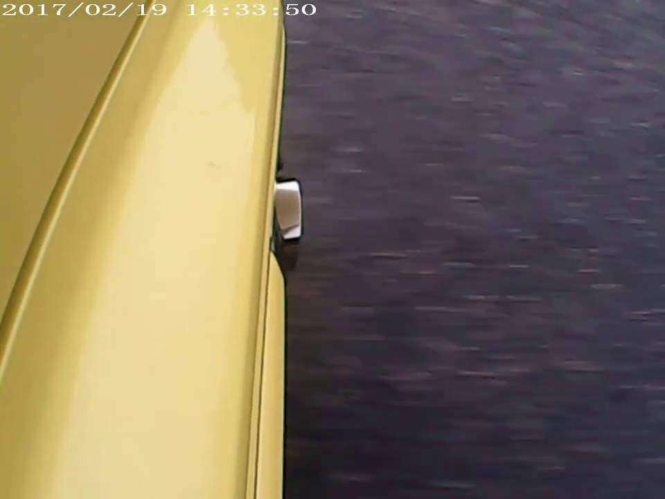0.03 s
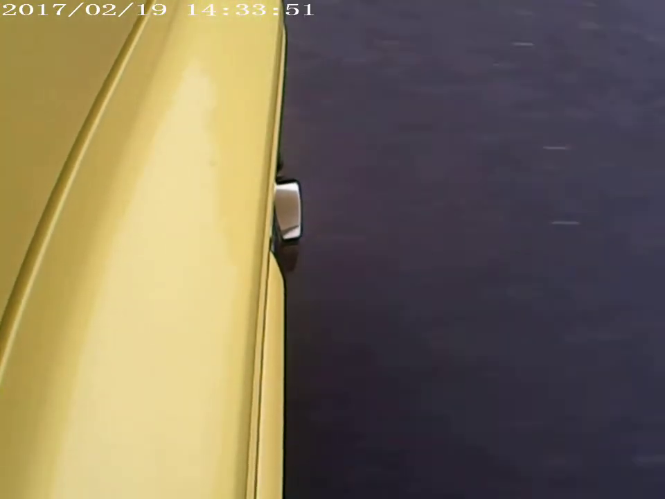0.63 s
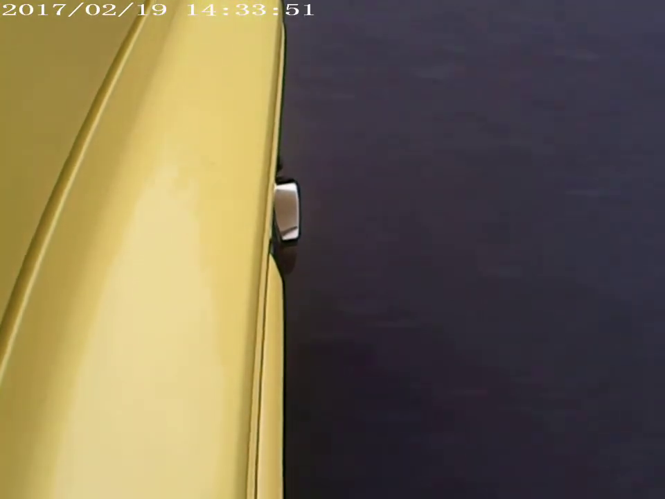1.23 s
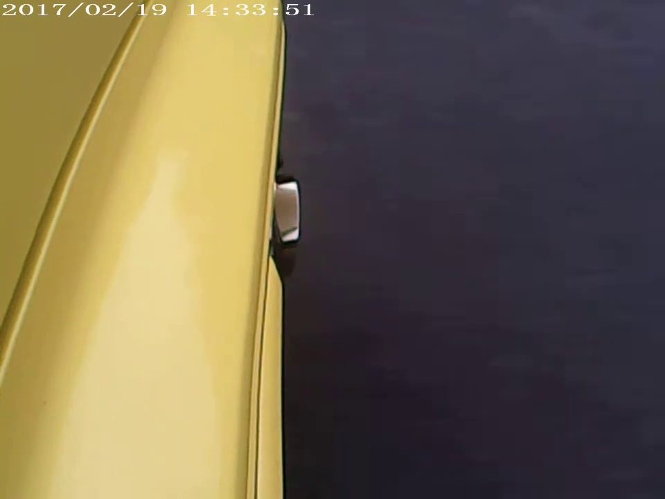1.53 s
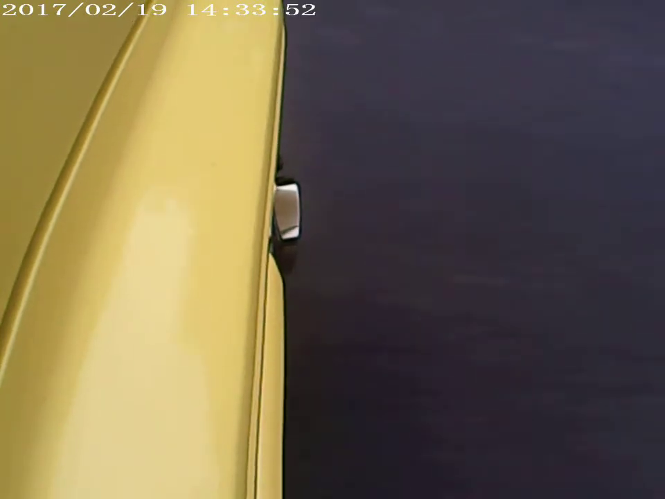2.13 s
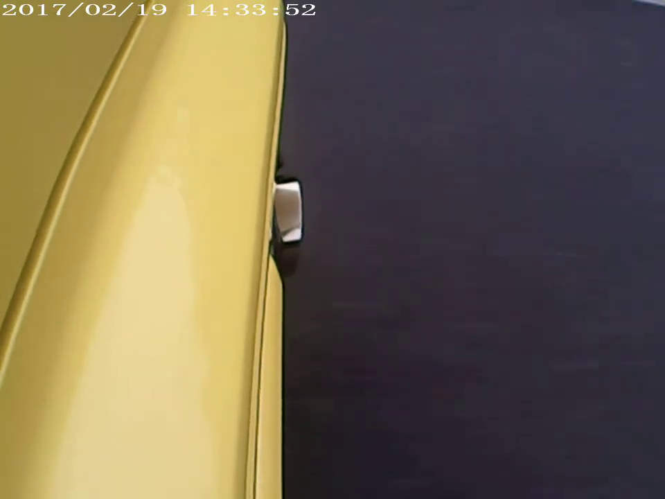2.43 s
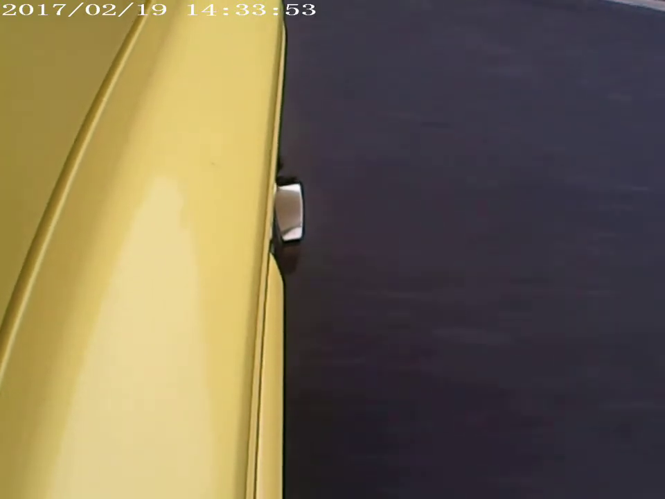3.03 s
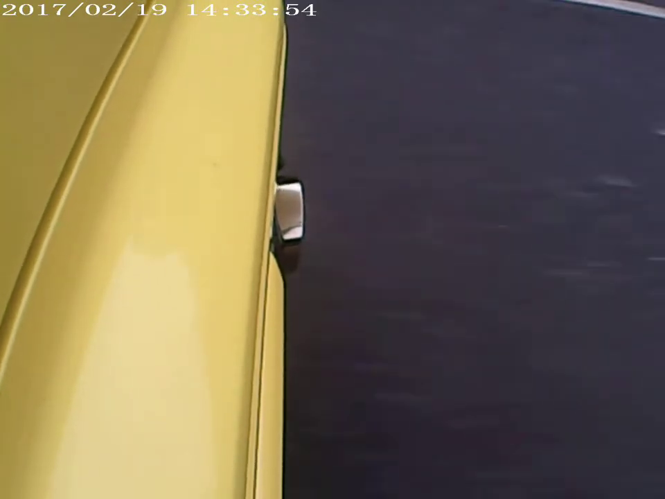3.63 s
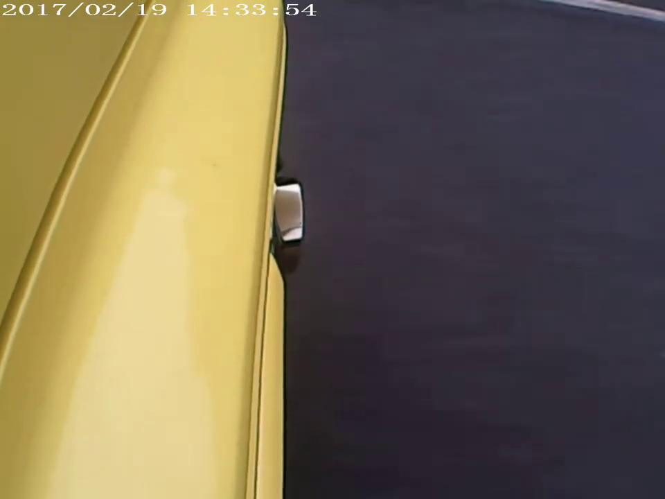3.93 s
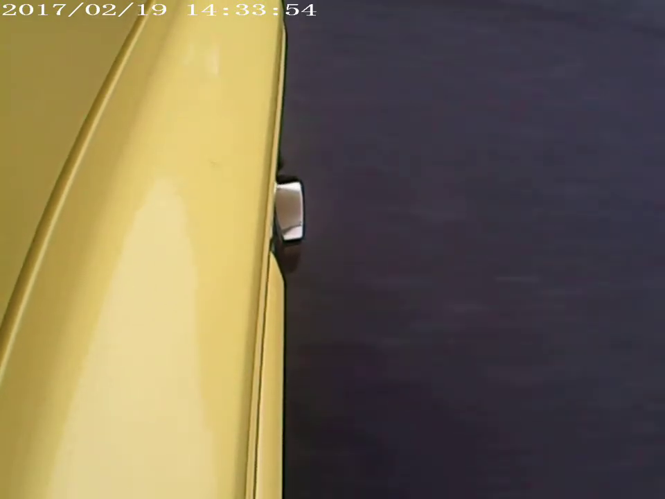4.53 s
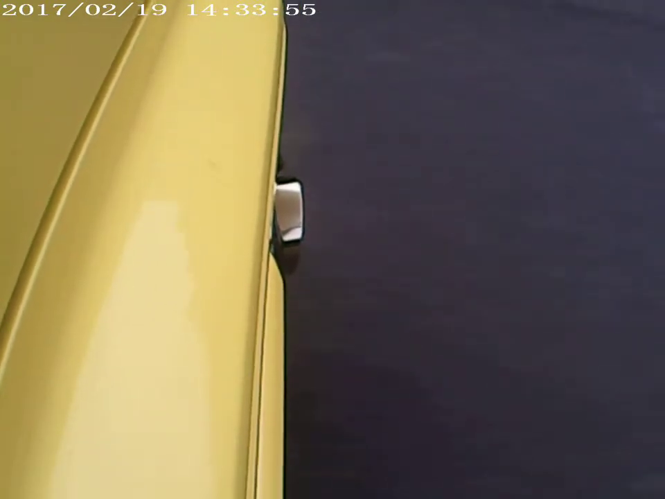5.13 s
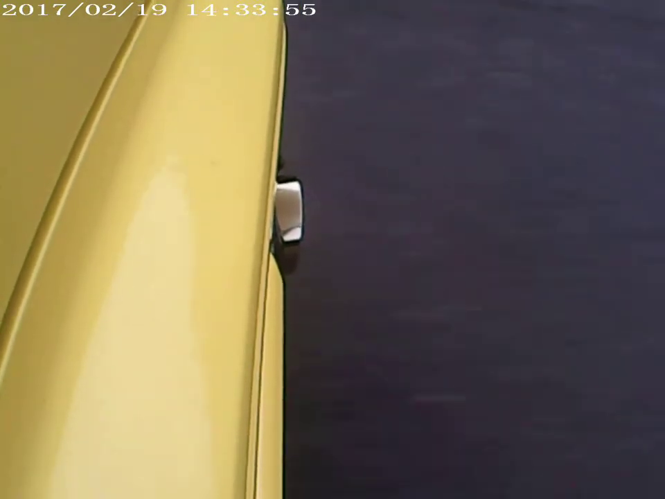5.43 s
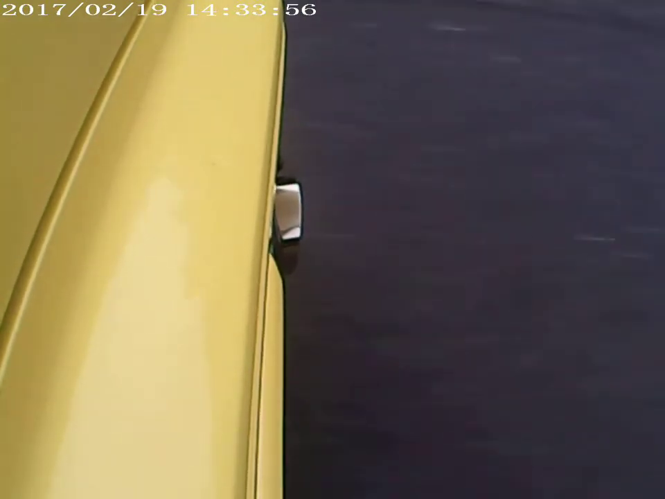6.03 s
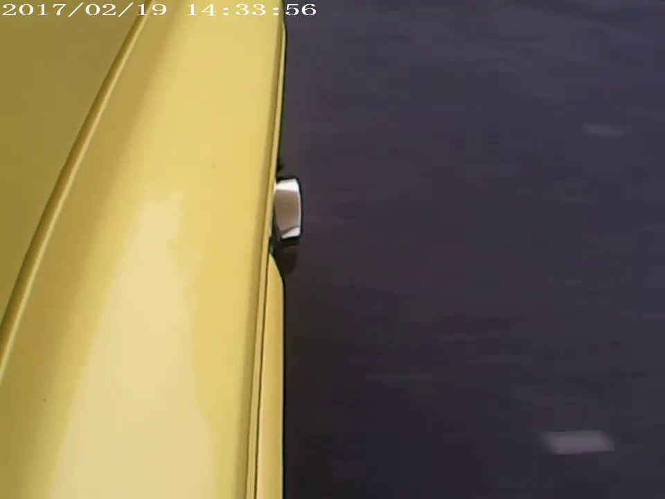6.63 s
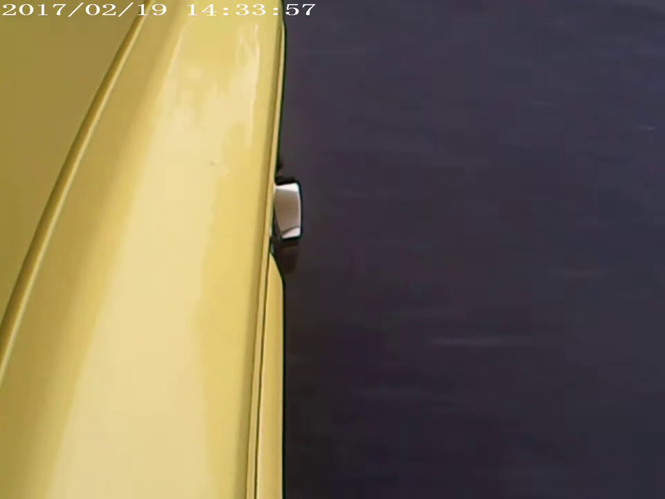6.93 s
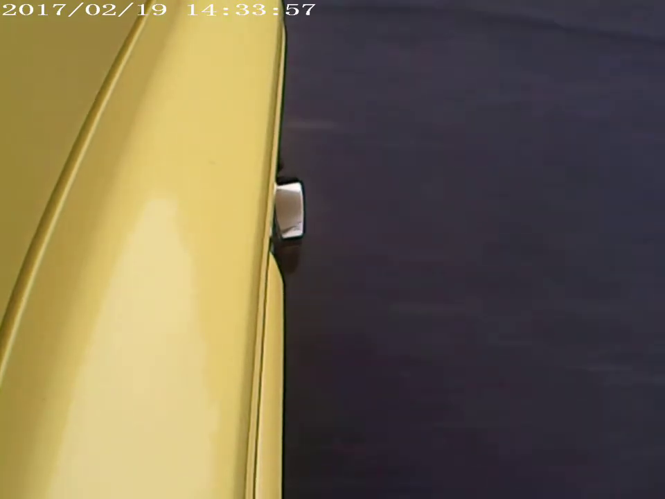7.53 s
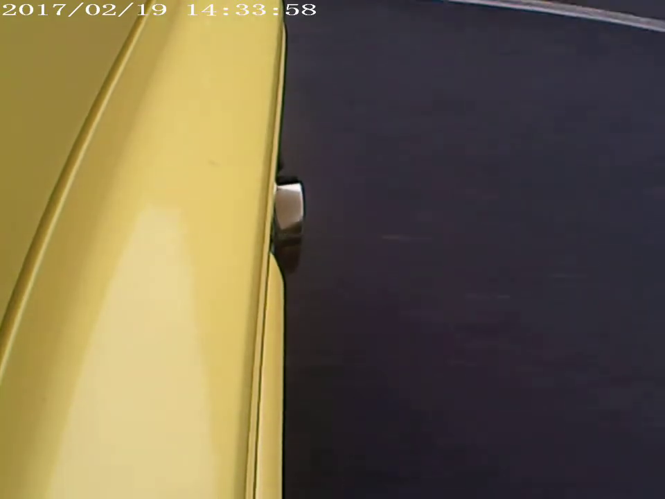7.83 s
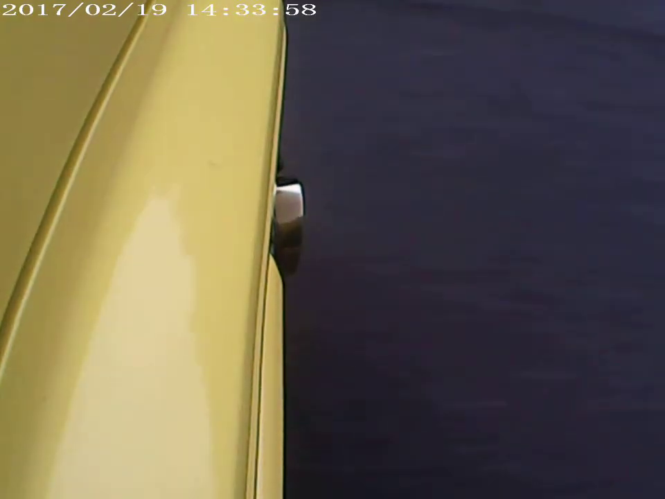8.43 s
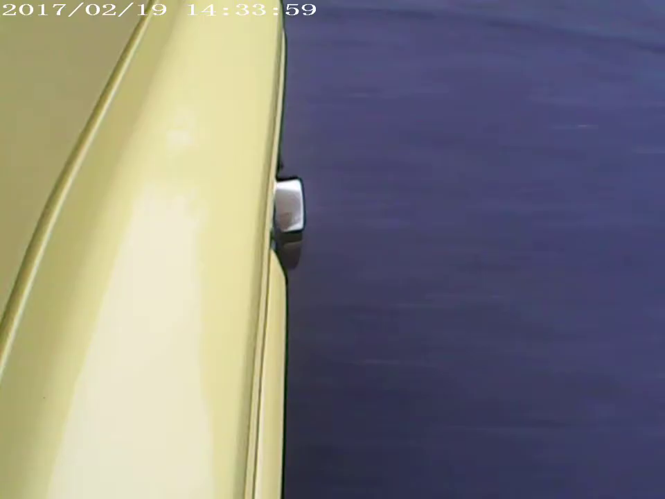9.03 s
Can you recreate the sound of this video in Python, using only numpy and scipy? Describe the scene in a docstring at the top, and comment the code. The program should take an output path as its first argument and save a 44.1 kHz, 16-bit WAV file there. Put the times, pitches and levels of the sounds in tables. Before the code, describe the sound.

Flurries of sharp crackle spit from a sports car's exhaust as it accelerates twice along a track, coasting after each pull. Each time the raspy engine drone falls away, there are muffled pops in the silencer and one hard bang that overloads the microphone. The microphone rides on the car's side, so wind buffeting and tyre roar run underneath, and everything sounds close and slightly boxy.

```python
"""On a race track, from a camera microphone riding on the flank of a four-cylinder sports car.
Close by, the exhaust drones and rasps through two pulls, and the car coasts after each.
On the overrun, fuel explodes at the tailpipe in two bangs that overload the microphone,
and lights in the silencer in strings of dull pops. Sharp crackle comes in flurries throughout,
over wind on the microphone and tyre roar. The camera housing colours it all."""
import sys
import numpy as np
from scipy import signal
from scipy.fft import rfft, irfft, next_fast_len
from scipy.io import wavfile
from scipy.ndimage import map_coordinates

SR = 44100
rng = np.random.default_rng(int(sys.argv[2]) if len(sys.argv) > 2 else 0)


def store_wav(level_fs):
    """Save 16-bit WAV to argv[1]."""
    pcm = np.round(np.clip(np.atleast_2d(level_fs), -1, 1) * 32767)
    wavfile.write(sys.argv[1], SR, pcm.T.astype(np.int16))


N = 408807
TIME = np.arange(N) / SR

# Levels in the tables are relative: each source adds its own gain.
# crankshaft speed: time_s, speed_hz
CRANK_SPEED = [(0.0, 57.4), (0.54, 61.36), (0.82, 64.76), (1.27, 74.45), (1.88, 90.05), (2.25, 96.44),
               (2.65, 93.4), (3.5, 89.77), (4.4, 84.68), (4.88, 69.57), (5.15, 68.44), (5.34, 61.35),
               (5.93, 65.72), (7.09, 79.76), (7.9, 78.64), (9.26, 75.76)]
# exhaust load, one list for each pull: time_s, load_db
PULL_LOADS = [
    [(0.0, -51.5), (0.6, -48), (1.0, -42.5), (1.16, -29), (1.5, -32.5), (1.78, -36.5), (2.15, -34.5),
     (2.22, -79)],
    [(5.1, -49.5), (5.53, -48), (5.91, -44), (6.24, -33), (6.54, -31.5), (7.04, -37), (7.16, -43.5),
     (7.3, -64)],
]
# the engine's low hum: time_s, level_db
HUM_LEVEL = [(0.0, -3), (0.55, -3), (0.8, -1.5), (1.4, 1), (1.85, -1), (2.18, 1.5), (2.28, -24),
             (2.85, -3.5), (3.55, -3), (4.08, -16), (4.36, -6.5), (4.7, -16), (5.3, -4), (6.2, -0.5),
             (7.05, -3.5), (7.4, -16), (9.27, -13)]
# brief low shudders at the crank speed: centre_s, level_db
CRANK_SHUDDERS = [(2.45, -38), (6.1, -40), (7.0, -37.5), (7.47, -32)]
# pipe resonances that lift the low orders: pitch_hz, gain_db
PIPE_RESPONSE = [(122, -36), (133, -28.5), (141, -23.5), (147, -33.5), (190, -33), (240, -33.5), (266, -30),
                 (280, -39), (289, -29), (303, -20), (337, -26), (356, -35.5)]
# exhaust note under load: crank_multiple, level_db
EXHAUST_ORDERS = [(3, 0.5), (5, -2), (6, 1.5), (7, -4), (8, -0.5), (9, -5), (10, -2.5), (11, -10), (12, -6),
                  (13, -9.5), (14, -16.5), (15, -12), (16, -15.5)]
# rasp of the exhaust gas: frequency_hz, level_db
RASP_SPECTRUM = [(100, -11), (300, 9), (480, -3), (750, 8.5), (1000, -9), (1500, 5), (2000, -12.5),
                 (3000, -28), (7000, -16)]
# hiss of the gas at high load: frequency_hz, level_db
HISS_SPECTRUM = [(900, -34.5), (1800, -4.5), (4000, -4.5), (7000, -4.5)]
# wind and tyres along the run: time_s, wind_db, tyre_db
ROAD_LEVELS = [(0.0, -40, -48), (0.64, -47, -48.5), (1.02, -39, -43), (1.18, -37.5, -43.5),
               (1.95, -43, -43.5), (2.25, -41, -45), (3.36, -35.5, -38), (3.54, -29.5, -39),
               (4.4, -38.5, -41.5), (5.59, -41.5, -41.5), (5.81, -40, -40.5), (6.2, -42, -39.5),
               (6.66, -44, -42), (7.43, -40.5, -46.5), (8.04, -41.5, -42), (8.61, -34.5, -42.5),
               (9.1, -37, -44), (9.2, -34, -42)]
# wind on the microphone: frequency_hz, level_db
WIND_SPECTRUM = [(15, -30), (28, 3.5), (48, -11.5), (65, 7), (88, 9.5), (115, -9.5), (200, -7.5),
                 (500, -56.5)]
# the car body booming on its tyres: frequency_hz, level_db
BOOM_SPECTRUM = [(70, -30.5), (130, -25.5), (190, -19.5), (245, -13), (312, 10.5), (390, -6), (480, -4.5),
                 (800, -33.5), (2000, -58)]
# tread roar: frequency_hz, level_db
TYRE_SPECTRUM = [(200, -0.5), (500, -4), (850, -4.5), (980, -0.5), (1090, 9.5), (1180, 1.5), (1330, -6.5),
                 (1650, 1.5), (2100, -24.5), (2800, -18), (4000, -28.5), (6800, -17.5)]
# flurries of crackle: start_s, end_s, top_level_db, chance_per_firing
CRACKLE_FLURRIES = [(0.02, 0.323, -9.5, 0.34), (0.49, 0.672, -11, 0.33), (1.14, 1.701, -7.5, 0.53),
                    (2.28, 2.7, -11, .4), (2.82, 3.37, -19, 0.21), (3.53, 4.651, -14, .22),
                    (4.66, 5.07, -10, 0.34), (5.26, 5.355, -19.5, 0.52), (6.05, 6.55, -15, 0.43),
                    (6.69, 7.1, -14.5, .55), (7.36, 7.581, -11.5, 0.9), (7.58, 7.758, -17.5, 0.33),
                    (8.04, 8.572, -14, 0.28), (8.58, 9.27, -12, .33)]
# the loudest cracks, fuller with more body: start_s, level_db, body_db
LOUD_CRACKS = [(0.0353, -3, -15.5), (0.0759, -9.5, -13), (0.158, -9, -14.5), (0.1825, -16, -7.5),
               (0.197, 0.5, -17), (0.2631, -14.5, -10), (0.307, -18.5, -8), (0.5283, -14, -10),
               (0.568, -6.5, -14), (0.611, -5.5, -18.5), (0.6401, -17, -1.5), (0.6542, -7.5, -17),
               (1.1584, -16, -12), (1.3263, -13, -25.5), (1.3736, 1, -15), (1.4118, -8, -21),
               (1.6469, -6, -12), (2.2916, -13.5, -17), (2.3716, -10, -18), (2.391, -12, -10.5),
               (2.48, -6.5, -12.5), (2.524, -10.5, -15.5), (2.5358, -12, -16.5), (2.5672, -11, -13.5),
               (2.6569, -12.5, -11), (2.8491, -12, -1), (2.8861, -17.5, -10), (3.023, -10, -5.5),
               (3.0365, -14, -2.5), (3.0766, -13.5, 0.5), (3.244, -13, -10), (3.263, -9.5, -8.5),
               (3.6256, -13.5, -5), (3.7592, -15, -8), (3.933, -13, -8.5), (3.952, -14.5, -3.5),
               (4.0485, -10.5, -4), (4.3296, -17, -4.5), (4.4161, -17, 5), (4.6389, -18, -2.5),
               (4.6707, -10, -12.5), (4.6848, -7.5, -11.5), (4.711, -8, -10.5), (4.7221, 0, -17),
               (4.8261, -9, -19.5), (4.8442, -7, -15.5), (4.8745, -7, -13), (4.9263, -12, -6.5),
               (4.967, 3, -14), (5.022, -4, -10.5), (5.3093, -12, -13.5), (6.0642, -8.5, -8),
               (6.3261, -12, -21.5), (6.4412, -12.5, -13), (6.4688, -10.5, -10), (7.0336, -14, -11),
               (7.1283, -12.5, -24.5), (7.6649, -9.5, -9.5), (8.0585, -20.5, -4.5), (8.1881, -10.5, -13.5),
               (8.2246, -13.5, -10), (8.397, -13.5, -9.5), (8.6155, -11.5, -6.5), (8.7312, -2, -15.5),
               (8.7729, -8, -14.5), (8.7893, -10, -15.5), (8.8672, -11.5, -17.5), (9.0541, -11.5, -14.5),
               (9.0991, -11, -14.5), (9.142, -15, -16), (9.1576, -6.5, -14)]
# lead-in, snap and rebound of a loud crack: delay_s, level_db
CRACK_CLUSTER = [(-0.0045, -17.5), (0, 0), (0.0043, -11)]
# dull pops inside the silencer: start_s, level_db
SILENCER_POPS = [(2.382, -16.5), (2.562, -19.5), (3.595, -16.5), (3.707, -15), (3.821, -12.5), (3.871, -19),
                 (3.915, -18.5), (3.973, -21), (8.607, -20.5), (8.736, -22.5), (8.86, -17.5),
                 (9.009, -15.5), (9.156, -21)]
# resonances of the silencer: pitch_hz, width_hz, gain_db
SILENCER_MODES = [(85, 51, 1), (177.4, 55, 2), (316, 190, -1.5), (672, 140, 3.5), (1410, 660, -27)]
# rumble after a pop or bang: frequency_hz, level_db
TAIL_SPECTRUM = [(30, -13.5), (150, -17), (330, 9), (550, -2.5), (800, -17.5), (1700, -13), (2500, -30),
                 (4200, -22), (7000, -20.5)]
# bangs at the tailpipe: start_s, level_db, burn_s, low_push_db, tail_db
BACKFIRES = [(3.406, 4.5, 0.018, -6.5, -15), (8.272, 0, 0.012, -23.5, -17.5)]
# bodywork struck by a bang: pitch_hz, level_db, t60_s
BODYWORK_MODES = [(311, -17, 0.28), (372, -7.5, 0.098), (437, -20, 0.18), (527, -19, 0.19),
                  (748, -13, 0.078), (1081, -9.5, 0.11), (1154, -8, 0.086), (1360, -16, 0.092),
                  (1519, -6.5, 0.08), (2180, -12.5, 0.036)]
# resonances of the camera housing: frequency_hz, gain_db
HOUSING_RESPONSE = [(1700, 0.5), (1950, 11.5), (2150, 6), (2400, 7), (2870, -11.5), (3170, 1.5), (3550, -5),
                    (4020, 4.5), (4450, -4.5), (5050, -13), (5650, -5.5), (6500, -15), (7100, -25),
                    (9000, -24)]


def amp(db):
    """Decibels to gain."""
    return 10 ** (np.asarray(db) / 20)


def unit(x):
    """x at rms 1."""
    return x / np.sqrt(np.mean(x ** 2) + 1e-20)


def curves(rows):
    """One value per sample for each column after the time."""
    times, *columns = np.transpose(rows)
    return [np.interp(TIME, times, column) for column in columns]


def along(points, hz):
    """(frequency_hz, value) points read on a log axis."""
    frequencies, values = np.transpose(points)
    return np.interp(np.log(hz + 1), np.log(frequencies), values)


def wobble(rate):
    """A smooth random curve, rate knots a second."""
    return map_coordinates(rng.standard_normal(int(N * rate / SR) + 4), [TIME * rate])


def filtered(x, response):
    """x through a complex response of frequency."""
    size = next_fast_len(len(x) + 8192)
    return irfft(rfft(x, size) * response(np.fft.rfftfreq(size, 1 / SR)), size)[:len(x)]


def coloured(x, points, size=2048):
    """x through a causal filter shaped by (frequency_hz, gain_db) points."""
    cepstrum = irfft(np.log(amp(along(points, np.fft.rfftfreq(size, 1 / SR)))))
    cepstrum[1:size // 2] *= 2
    cepstrum[size // 2 + 1:] = 0
    return signal.fftconvolve(x, irfft(np.exp(rfft(cepstrum))))[:len(x)]


def noise(spectrum, size=N):
    """Noise of rms 1 with the given spectrum."""
    return unit(filtered(rng.standard_normal(size), lambda hz: amp(along(spectrum, hz))))


def ring(x, modes):
    """x through a set of resonances."""
    return filtered(x, lambda hz: sum(amp(db) * 1j * hz * width / (pitch**2 - hz**2 + 1j * hz * width)
                                      for pitch, width, db in modes))


def add(track, start_s, sound):
    """Mix a sound into the track."""
    start = int(np.clip(round(start_s * SR), 0, N - 1))
    track[start:start + len(sound)] += sound[:N - start]


def engine_hum(speed, angle, load, throttle, shudder_s=0.11, overrun_db=-13.5):
    """Clean low orders: the crank shudders; the firing tone and its octave sweep the pipe's resonances."""
    level = amp(curves(HUM_LEVEL)[0])
    shudder = sum(amp(db) * np.exp(-((TIME - s) / shudder_s) ** 2) for s, db in CRANK_SHUDDERS)
    crank = (load * amp(-14) + shudder) * np.sin(angle + 0.37 * wobble(15))
    firing = amp(along(PIPE_RESPONSE, 2 * speed) + 1.1 * wobble(25)) * np.sin(2 * angle)
    octave_db = overrun_db * (1 - throttle) + 1.3 * wobble(25)
    octave = amp(along(PIPE_RESPONSE, 4 * speed) + octave_db) * np.sin(4 * angle)
    return np.sqrt(2) * (crank + level * (firing + octave))


def exhaust_note(speed, angle, load, throttle, gain_db=-5, drone_db=-38, drone_hz=345):
    """Rough upper orders grow with load; even on light throttle each drones at the pipe's resonance."""
    note = 0
    for order, db in EXHAUST_ORDERS:
        drone = throttle * amp(drone_db) / (1 + ((order * speed - drone_hz) / 55) ** 4)
        level = np.hypot(load * amp(db + gain_db), drone)
        flutter = amp(2 * wobble(30))
        note += level * flutter * np.sin(order * angle + 0.28 * wobble(50) + rng.uniform(0, 2 * np.pi))
    return note


def exhaust_gas(angle, load, rasp_db=-2.5, hiss_db=-38, hiss_onset_db=-42):
    """Each firing lets out a rasping puff of gas, which hisses at high load."""
    puffs = unit(np.exp(0.67 * np.cos(2 * angle)) * amp(1.9 * wobble(120)))
    jet = (load / amp(hiss_onset_db)) ** 4
    rasp = load * amp(rasp_db) * noise(RASP_SPECTRUM)
    hiss = jet / (1 + jet) * amp(hiss_db) * noise(HISS_SPECTRUM)
    return puffs * (rasp + hiss)


def engine(jitter_rad=0.012):
    """Four cylinders at close range, firing twice per turn of the crank."""
    speed = curves(CRANK_SPEED)[0]
    angle = 2 * np.pi * np.cumsum(speed) / SR + jitter_rad * wobble(45)
    load = sum(np.interp(TIME, pull[:, 0], amp(pull[:, 1]), 0, 0) for pull in map(np.array, PULL_LOADS))
    throttle = load / (load + amp(-62))
    hum = engine_hum(speed, angle, load, throttle)
    return hum + exhaust_note(speed, angle, load, throttle) + exhaust_gas(angle, load)


def wind(gain_db=-2):
    """Passing air buffets the microphone."""
    level_db = curves(ROAD_LEVELS)[0]
    return amp(level_db + gain_db + 1.3 * wobble(5.7)) * noise(WIND_SPECTRUM)


def tyres(boom_gain_db=-0.5, roar_gain_db=3):
    """The treads roar on the track and set the car body booming."""
    level_db = curves(ROAD_LEVELS)[1]
    boom = amp(level_db + boom_gain_db + 1.8 * wobble(11)) * noise(BOOM_SPECTRUM)
    roar = amp(level_db + roar_gain_db + 1.2 * wobble(18)) * noise(TYRE_SPECTRUM)
    return boom + roar


def crack(dull_db, decay_s=0.00079, low_cut_hz=1250):
    """One sharp snap, 2 ms into a tiny burst of fizz; a duller one holds more below 2.8 kHz."""
    size = SR // 90
    age = np.arange(size) / SR - 0.002
    spit = 0.5 * rng.standard_normal(size) * np.exp(-np.abs(age) / decay_s) * (age >= 0)
    fizz = 0.08 * rng.lognormal(0, 0.44) * rng.standard_normal(size) * np.exp(-np.abs(age) / 0.0011)
    snap = spit + fizz
    snap[np.argmax(age >= 0)] += 1
    hz = np.fft.rfftfreq(size, 1 / SR)
    tilt = amp(rng.normal(0, 2) * np.log2(np.maximum(hz, 2000) / 4000))
    shelf = 1 + (amp(dull_db) - 1) / (1 + (hz / 2800) ** 6)
    band = hz / np.hypot(hz, low_cut_hz) * (hz < 7500)
    snap = irfft(rfft(snap) * shelf * band * tilt, size)
    return snap / np.abs(coloured(snap, HOUSING_RESPONSE)).max()  # peaks at 1 inside the housing


def crackle(range_db=17, scatter_s=0.0024, stray_db=-24, stray_chance=0.1):
    """Any firing may set off a small crack, mostly weak; in a flurry they come thick and strong."""
    firing_count = np.floor(2 * np.cumsum(curves(CRANK_SPEED)[0]) / SR)
    firings = TIME[1:][np.diff(firing_count) > 0]
    snaps = [crack(dull_db) for dull_db in rng.normal(0, 3.9, size=100)]
    out = np.zeros(N)
    for s, (luck, weakness, pick, late) in zip(firings, rng.random((len(firings), 4))):
        flurry = ((db, chance) for start, end, db, chance in CRACKLE_FLURRIES if start <= s < end)
        top_db, chance = next(flurry, (stray_db, stray_chance))
        if luck < chance:
            level = amp(top_db - range_db * np.sqrt(weakness))
            add(out, s + scatter_s * late, level * snaps[int(pick * len(snaps))])
    return out


def loud_cracks(gain_db=0.5, ceiling_db=-3.5):
    """Clear cracks, some thin and some full, each flanked by weaker ones."""
    out = np.zeros(N)
    mean_body_db = np.mean(LOUD_CRACKS, axis=0)[2]
    for start_s, level_db, body_db in LOUD_CRACKS:
        dull_db = -3 + 1.4 * (body_db - mean_body_db)
        for delay_s, part_db in CRACK_CLUSTER:
            onset_s = start_s - 0.0013 + delay_s * rng.lognormal(0, 0.27)
            add(out, onset_s, amp(min(level_db + gain_db + part_db, ceiling_db)) * crack(dull_db))
    return out


def blast(t, length_s):
    """A pressure jump followed by its suction."""
    return (1 - t / length_s) * np.exp(-t / length_s)


def silencer_pops(gain_db=4, tail_db=-23, tail_t60_s=0.43):
    """Fuel lights inside the silencer: a soft blast, three weaker burps and a short boom."""
    t = np.arange(SR // 4) / SR
    pulse = blast(t, 0.0012)
    out = np.zeros(N)
    for start_s, level_db in SILENCER_POPS:
        churn = 0.09 * rng.standard_normal(len(t)) * amp(-60 * t / 0.072)
        push = pulse + churn
        for burp_s in rng.uniform(0.016, 0.076, 3):
            push += amp(rng.normal(-17, 3)) * np.interp(t - burp_s, t, pulse, 0)
        thud = ring(push, SILENCER_MODES)
        boom = amp(tail_db - 60 * t / tail_t60_s) * noise(TAIL_SPECTRUM, len(t))
        add(out, start_s, amp(level_db + gain_db) * (boom - thud / np.abs(thud).max()))
    return out


def backfires(flame_db=-4, tail_t60_s=0.34, echo_s=0.038, echo_db=-10):
    """Fuel explodes at the tailpipe: a shock, a tearing flame, ringing bodywork and a trackside echo."""
    t = np.arange(SR // 2) / SR
    flame_spectrum = [(150, -9), (1000, 0.5), (1600, 2), (2200, -4.5), (4000, -1.5), (7000, -6)]
    echo = ring(np.interp(t - echo_s, t, -blast(t, 0.0011), 0), SILENCER_MODES)
    echo *= amp(echo_db) / np.abs(echo).max()
    out = np.zeros(N)
    for start_s, level_db, burn_s, low_push_db, tail_db in BACKFIRES:
        burning = (1 - np.exp(-t / 0.002)) / (1 + (t / burn_s) ** 6)
        flame = amp(flame_db) * burning * noise(flame_spectrum, len(t))
        bodywork = sum(amp(db - 60 * t / t60_s) * np.sin(2 * np.pi * hz * t + rng.normal(0, 1))
                       for hz, db, t60_s in BODYWORK_MODES)
        bodywork *= 1 - np.exp(-t / 0.0041)
        shock = -1.6 * blast(t, 0.0007) - amp(low_push_db) * blast(t, 0.018)
        tail = amp(tail_db - 60 * t / tail_t60_s) * noise(TAIL_SPECTRUM, len(t))
        add(out, start_s, amp(level_db) * (shock + flame + bodywork + tail + echo))
    return out


def scene():
    """Everything reaches one microphone on the side of the car."""
    return (engine() + wind() + tyres() + loud_cracks() + silencer_pops() + backfires() + crackle())[None]


def record(dry, overload=0.71, treble_hz=6900, top_hz=16500):
    """Inside its resonant housing the microphone overloads on the bangs and passes little treble."""
    housed = coloured(dry[0], HOUSING_RESPONSE)
    squashed = housed / (1 + np.abs(housed / overload) ** 6) ** (1 / 6)
    dull = filtered(squashed, lambda hz: 1 / np.sqrt(1 + (hz / treble_hz) ** 70))
    clipped = np.clip(dull, -overload, overload)
    return filtered(clipped, lambda hz: hz < top_hz)[None]


dry = scene()
out = record(dry)
store_wav(out)
```